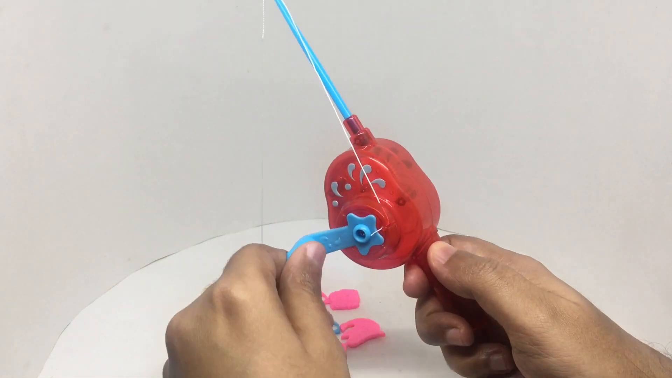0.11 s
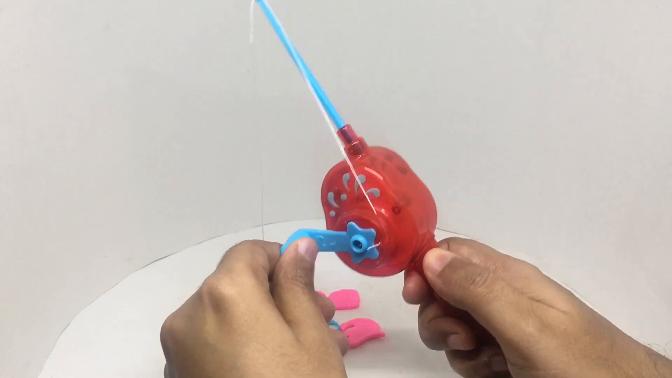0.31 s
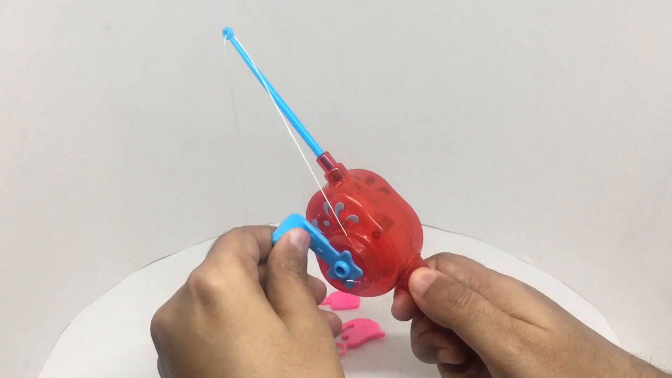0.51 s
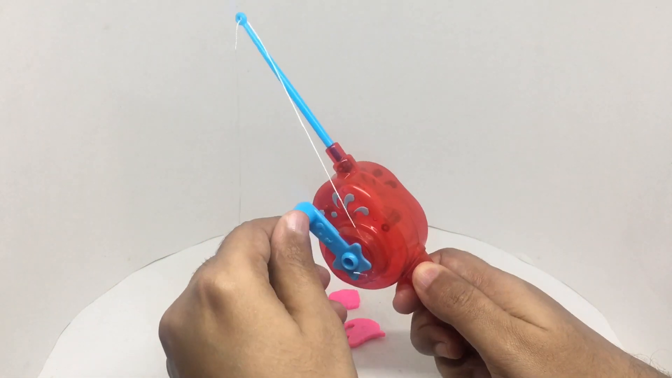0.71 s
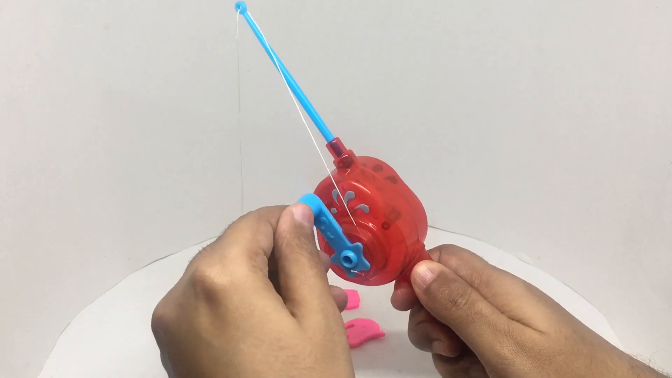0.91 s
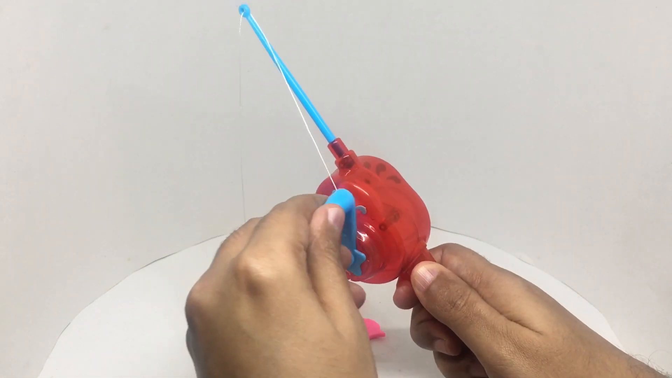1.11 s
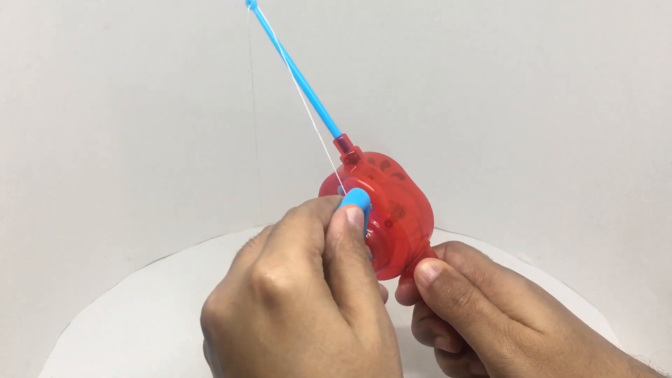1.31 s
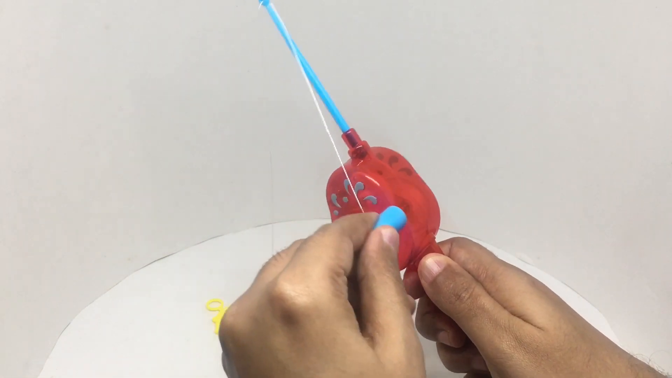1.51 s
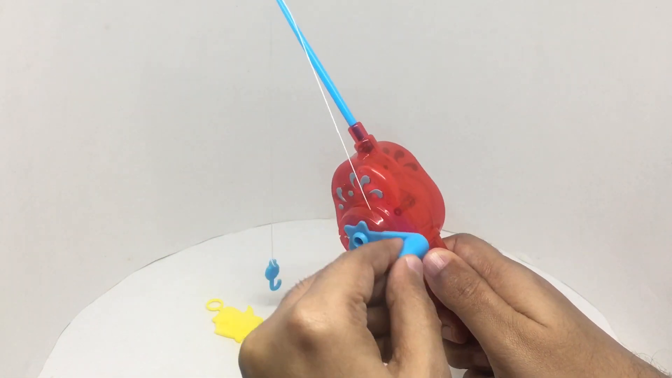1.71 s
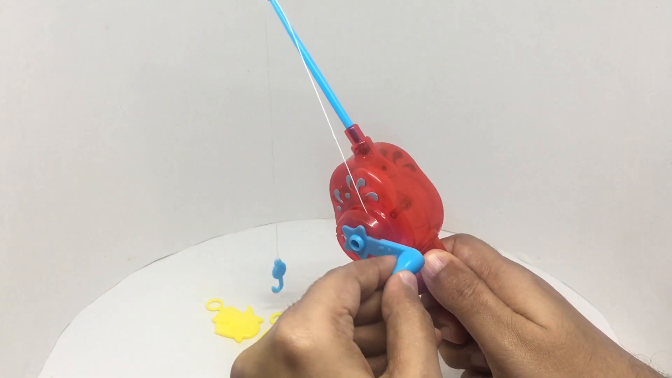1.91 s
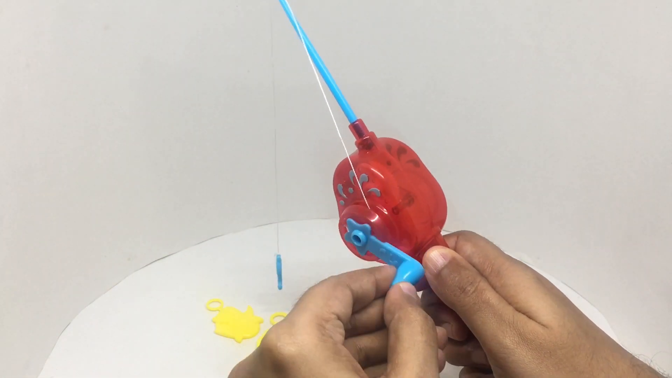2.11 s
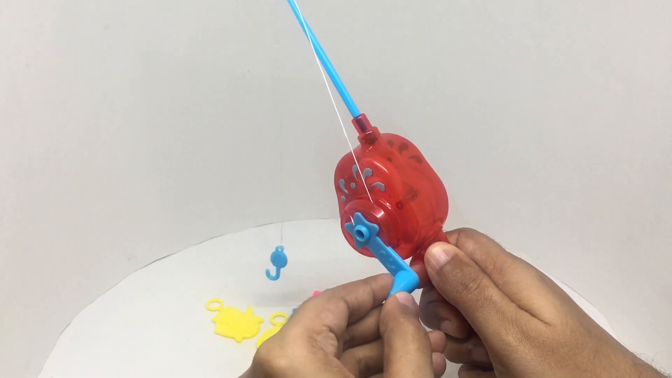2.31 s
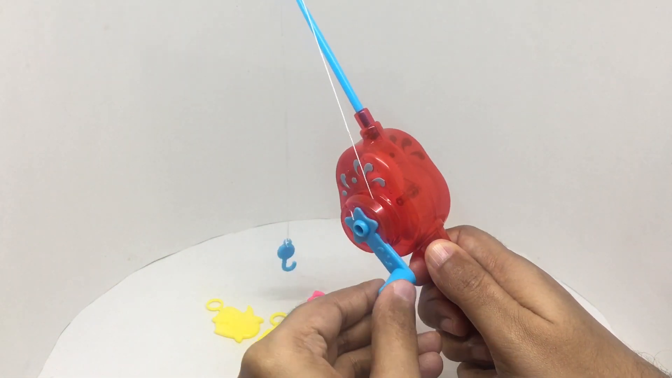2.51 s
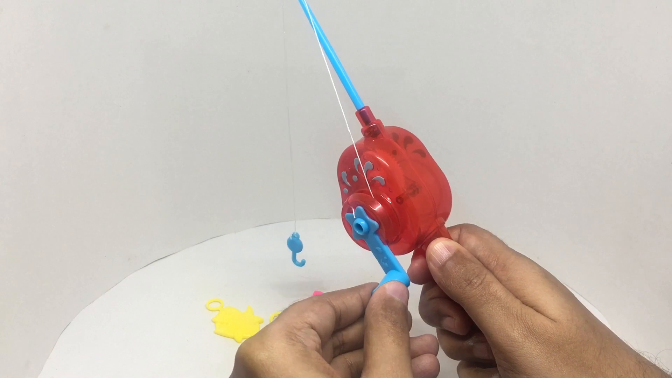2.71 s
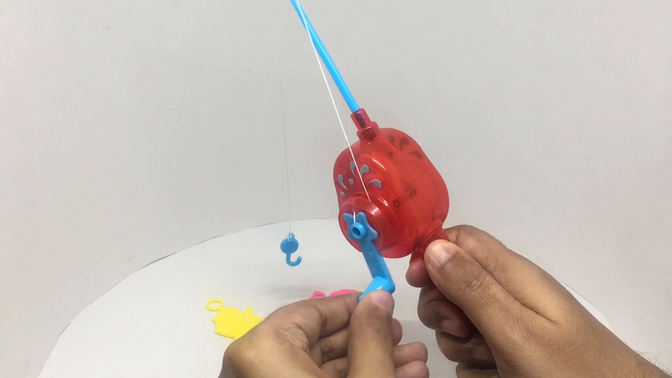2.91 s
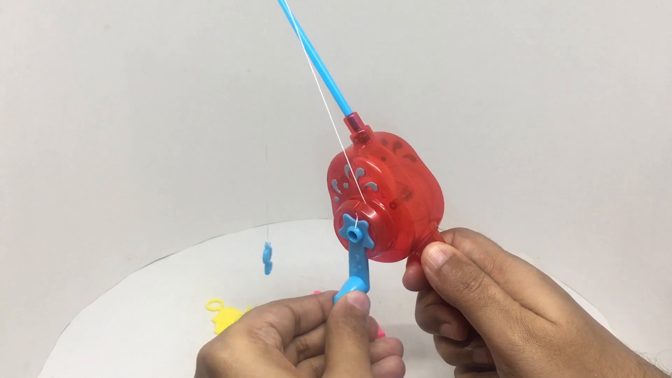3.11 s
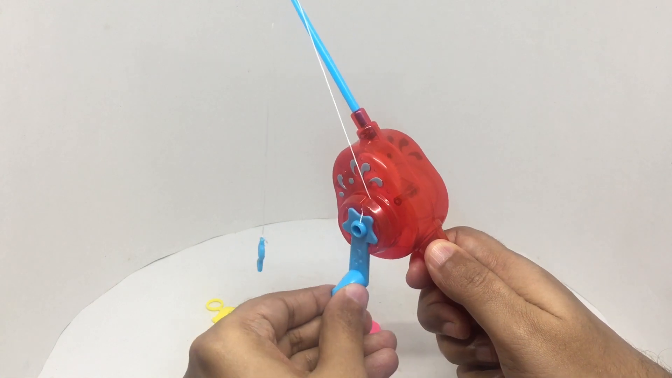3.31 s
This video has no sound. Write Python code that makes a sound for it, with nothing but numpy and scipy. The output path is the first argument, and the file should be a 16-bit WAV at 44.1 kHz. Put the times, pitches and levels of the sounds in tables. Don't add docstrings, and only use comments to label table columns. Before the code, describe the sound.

Sharp, hollow plastic clicks from a hand-turned toy reel: a quick first run, shorter bursts, then slower scattered snaps; close microphone in a hard, reverberant room with barely audible low hum.

```python
import sys
import numpy as np
from scipy import signal
from scipy.fft import rfft, irfft
from scipy.io import wavfile
from scipy.ndimage import uniform_filter1d

SR = 44100
rng = np.random.default_rng(int(sys.argv[2]) if len(sys.argv) > 2 else 0)


def magnitude_from_level(level_db):
    exponent = np.asarray(level_db, float) / 20
    return 10 ** exponent


def digitize_waveform(pressure):
    field = np.atleast_2d(pressure).T
    bounded = np.clip(field, -1, 1)
    quanta = np.round(bounded * 32767).astype(np.int16)
    wavfile.write(sys.argv[1], SR, quanta)


N = 147735
SNAP_SIZE = 2048


def evened(x):
    return x / np.sqrt(np.mean(x ** 2) + 1e-20)


def read(points, hz):
    f, value = np.transpose(points)
    return np.interp(np.log(hz + 1), np.log(f + 1), value)


def ring(hz, centre_hz, width_hz):
    return 1j * hz * width_hz / (centre_hz ** 2 - hz ** 2 + 1j * hz * width_hz)


def coloured(gain):
    return evened(irfft(rfft(rng.standard_normal(N)) * gain, N))


# start in seconds, strength in dB, shell thump in dB, brightness in dB.
SNAPS_A = [(0.2164, -12, 10, 1.5), (0.2455, -13.5, -1.5, 1), (0.2689, -13.5, -4, -0.5),
           (0.2916, -14.5, -2, 1.5), (0.3226, -16, -1.5, -1), (0.3455, -14, -3, 0.5),
           (0.3757, -13.5, -2, 1), (0.4192, -14.5, -1.5, 0), (0.4619, -13.5, -4, 1), (0.834, -14.5, 2, 2),
           (0.9023, -13.5, -5, 1.5), (0.936, -14, -1.5, 2), (0.96, -14.5, -1.5, 1),
           (0.9879, -14, 6.5, -0.5), (1.0265, -14, 6, 1), (1.06, -14, -4, 0.5), (1.289, -14, -1.5, 2),
           (1.3447, -14, -4, 2), (1.3722, -15.5, 2, -0.5), (1.398, -15.5, -3, 0), (1.4241, -15.5, 3, 1)]
# start in seconds, strength in dB, shell thump in dB, brightness in dB.
SNAPS_B = [(1.46,-14.5,2,0.65), (1.486,-16.5,-3,-0.41), (1.5211,-16,-1,-0.37), (1.5779,-14.5,12.5,0.033),
           (1.6357,-17,3,0.49), (1.6744,-16,6,0.18), (1.9724,-15,2.5,1), (2.0205,-17,7,1),
           (2.0493,-15.5,5,1), (2.0848,-15,3,1), (2.1402,-14,-26,0.91), (2.2394,-14.5,1,0.99),
           (2.532,-14,10.5,-0.31), (2.7571,-14.5,-11,0.036), (2.8112,-14,10,0.54), (2.8457,-14,12,-0.64),
           (2.8795,-13.5,3.5,-2.3), (2.9387,-14.5,6,-1.9), (2.9966,-14.5,6.5,-0.87), (3.0683,-14.5,7,-1.6)]
# start in seconds, strength in dB, shell thump in dB, brightness in dB.
SLIPS = [
    (0.197, -58.5, -5.5, -14),
    (0.204, -66, -6, -20),
    (2.518, -49, 3, -16),
]
# start in seconds, knock in Hz, knock in dB, low modes in dB,
# cup mode in dB, pitch ratio of the top modes.
GRIPS = [
    (0, 1080, -25, -2, 0, 1.05),
    (.8, 1105, -19.5, 2, 1.5, 1.063),
    (1.25, 593, -18.5, 0, 5, 1.07),
    (1.9, 800, -29.5, 5, 4, 1.015),
    (2.5, 624, -25.5, 3, 6, 0.997),
    (2.7, 580, -29, -2, 1, 1.02),
]


def reel():
    out = np.zeros((3, N + SNAP_SIZE))
    for start_s, strength_db, thump_db, bright_db in SNAPS_A + SNAPS_B + SLIPS:
        at = round(start_s * SR)
        grip = [g for g in GRIPS if g[0] <= start_s][-1]
        out[:, at:at + SNAP_SIZE] += snap(grip, strength_db, thump_db, bright_db)
    return out[:, :N]


RISE_S, HOLD_S, CHATTER_T60_S = 0.001, 0.0013, 0.0165
GRIT, EVEN, CREST = 0.25, 0.45, 1.4
PIVOT_HZ, BODY_LAG_S = 4630, 0.0008
APART_T60_S, SNAP_DB = 0.028, -5.5
# frequency in Hz, level of the difference against the
# sum in dB.
SNAP_APART = [(500, -20), (2000, -16.5), (5000, -11.5), (10000, -8.5), (15000, -14.5)]


def snap(grip, strength_db, thump_db, bright_db):
    t, hz = np.arange(SNAP_SIZE) / SR, np.fft.rfftfreq(SNAP_SIZE, 1 / SR)
    grit = rng.standard_normal((3, SNAP_SIZE))
    lumps = np.exp(GRIT * evened(uniform_filter1d(grit[2], size=12)))
    attack = np.minimum(t / RISE_S, 1) ** 2
    decay = magnitude_from_level(-60 * np.maximum(t - RISE_S - HOLD_S, 0) / CHATTER_T60_S)
    shape = lumps * attack * decay

    raw = rfft(grit[:2] * shape)
    flat = irfft(raw / (abs(raw) + 1e-9) ** EVEN, SNAP_SIZE)
    limit = CREST * shape * np.linalg.norm(flat[0]) / np.linalg.norm(shape)
    chatter = rfft(np.clip(flat, -limit, limit))

    tilt = magnitude_from_level(bright_db * np.tanh(np.log2((hz + 1) / PIVOT_HZ)))
    lag = np.exp(-2j * np.pi * hz * BODY_LAG_S / (1 + (hz / PIVOT_HZ) ** 2))
    apart = np.array([np.ones(len(hz)), magnitude_from_level(read(SNAP_APART, hz))])
    struck = chatter * shell(hz, grip, thump_db) * tilt * lag * apart

    smooth = np.sqrt(uniform_filter1d(abs(struck[0]) ** 2, size=21))
    blurred = smooth * struck[0] / (abs(struck[0]) + 1e-12)
    out = irfft(np.vstack([struck, blurred]), SNAP_SIZE)
    out[1] *= magnitude_from_level(-60 * t / APART_T60_S)
    out[2] *= np.hanning(SNAP_SIZE * 2)[SNAP_SIZE:] ** 4
    peak = np.sqrt(uniform_filter1d(out[0] ** 2, size=88).max())
    return magnitude_from_level(strength_db + SNAP_DB) * out / peak


# frequency in Hz, width in Hz, level in dB.
SHELL = [(1790, 240, -34.5), (2490, 67, -13), (3125, 129, -9), (3374, 225, -9.5), (4363, 262, -1.5),
         (5264, 300, -6), (5870, 370, -6), (6640, 226, -5), (7400, 230, -8.5), (9774, 450, 0.5),
         (10440, 280, 0), (11340, 470, 0.5), (13600, 360, -27), (16340, 1000, -9)]
# frequency in Hz, level in dB.
CRACK = [(250, -58), (600, -25.5), (2800, -15), (3750, -22), (5500, -12.5), (10000, -5), (13500, -27.5),
         (16000, -3)]
THUMP_HZ, THUMP_WIDTH_HZ, THUMP_DB = 778, 290, -28.5
KNOCK_WIDTH_HZ = 80
LOW_HZ, CUP_HZ = 3800, 4800
TOP_HZ, TOP_END_HZ = 9000, 13750
MODE_SPREAD, MODE_SPREAD_DB = 0.014, 1.5


def shell(hz, grip, thump_db):
    _, knock_hz, knock_db, low_db, cup_db, top_ratio = grip
    thump = magnitude_from_level(THUMP_DB) * ring(hz, THUMP_HZ, THUMP_WIDTH_HZ) ** 2
    knock = magnitude_from_level(knock_db) * ring(hz, knock_hz, KNOCK_WIDTH_HZ)
    body = magnitude_from_level(read(CRACK, hz)) + magnitude_from_level(thump_db) * (thump + knock)
    vary_level, vary_pitch = rng.standard_normal((2, len(SHELL)))
    for (mode_hz, width_hz, db), a, b in zip(SHELL, vary_level, vary_pitch):
        held_db = low_db if mode_hz < LOW_HZ else cup_db if mode_hz < CUP_HZ else 0
        ratio = top_ratio if TOP_HZ < mode_hz < TOP_END_HZ else 1
        heard_hz = mode_hz * ratio * (1 + MODE_SPREAD * b / 2)
        body = body + magnitude_from_level(db + held_db + MODE_SPREAD_DB * a) * ring(hz, heard_hz, width_hz)
    return body


# frequency in Hz, t60 in seconds.
ROOM = [(500, .5), (1300, 0.85), (3200, 0.76), (9000, 0.61), (13000, 0.4262), (16000, 0.45)]
# frequency in Hz, level in dB.
ROOM_TONE = [(550, -1), (1200, 0), (1900, -1), (2500, 1), (4400, -3), (7000, -0.45), (10500, -0.2),
             (15000, -1.5)]
ROOM_DB, ROOM_START_S, NEAR_DB, NEAR_T60_S = -6, 0.0023, -12, 0.03


def room(x):
    out = np.zeros(N)
    turn = np.arange(N) / SR * 7 * np.pi
    u = np.arange(SR) / SR
    for k in range(3):
        taps = np.zeros(SR)
        at = np.arange(0, SR - 12, 12)
        taps[at + rng.integers(0, 12, len(at))] = rng.choice([-1., 1.], len(at))
        hz, t, z = signal.stft(taps, SR, nperseg=256)
        fade_db = read(ROOM_TONE, hz)[:, None] - 60 * t / read(ROOM, hz)[:, None]
        late = signal.istft(z * magnitude_from_level(fade_db), SR, nperseg=256)[1][:SR]
        near = taps * magnitude_from_level(-60 * u / NEAR_T60_S)
        tail = magnitude_from_level(ROOM_DB) * late / np.linalg.norm(late) + magnitude_from_level(NEAR_DB) * near / np.linalg.norm(near)
        tail *= np.clip(u / ROOM_START_S, 0, 1) ** 2
        feed = x * np.sqrt(2 / 3) * np.cos(turn + k * np.pi / 3)
        out += signal.fftconvolve(feed, tail)[:N]
    return out


# frequency in Hz, level in dB per Hz.
FLOOR = [(20, -13), (60, -12.5), (150, -15), (350, -19), (600, -26.5), (900, -32.5), (5000, -38.5),
         (16000, -46.5)]
FLOOR_DB = -69.5
# frequency in Hz, width in Hz, rms level in dB.
HUM = [(115.3, 15, -76.5), (179, 3.6, -74), (196, 9.9, -69), (208.7, 5.3, -71), (490, 80, -84.5),
       (564, 60, -80.5)]
HUM_STEADY = 0.85
# frequency in Hz, level of the difference against the sum in dB.
APART = [(25, -6), (60, -2.5), (190, -21), (300, -12.5), (700, -16.5), (1300, -32)]


def floor():
    hz = np.fft.rfftfreq(N, 1 / SR)
    mid = magnitude_from_level(FLOOR_DB) * coloured(magnitude_from_level(read(FLOOR, hz)))
    for centre_hz, width_hz, db in HUM:
        band = signal.hilbert(coloured(abs(ring(hz, centre_hz, width_hz)) ** 2))
        mid += magnitude_from_level(db) * evened((band / abs(band) ** HUM_STEADY).real)
    scatter = np.exp(2j * np.pi * rng.random(len(hz)))
    side = irfft(abs(rfft(mid)) * magnitude_from_level(read(APART, hz)) * scatter, N)
    return mid, side


def scene():
    click, click_side, spread = reel()
    hum, hum_side = floor()
    mid = click + room(spread) + hum
    side = click_side + hum_side
    return np.array([mid + side, mid - side])


def band_limit(x):
    return signal.sosfilt(signal.butter(12, 17140, fs=SR, output="sos"), x)


def record(dry):
    edge = signal.firwin(255, 15750, window=("kaiser", 6), fs=SR)
    mix = signal.oaconvolve(dry, edge[None], "same")
    return band_limit(mix)


dry = scene()
out = record(dry)
digitize_waveform(out)
```